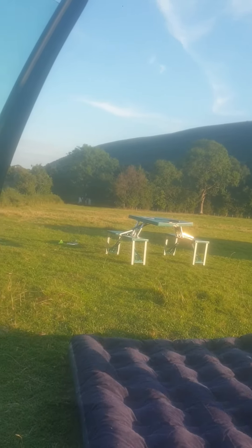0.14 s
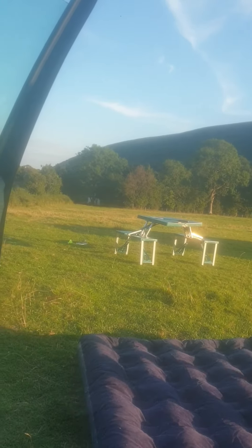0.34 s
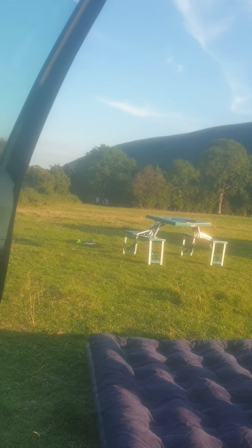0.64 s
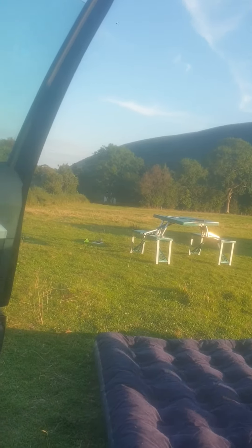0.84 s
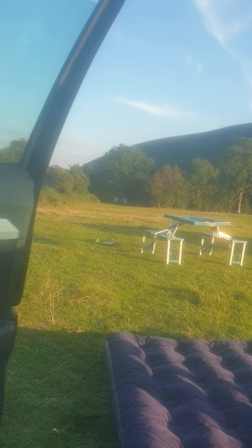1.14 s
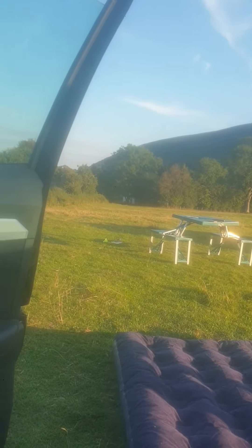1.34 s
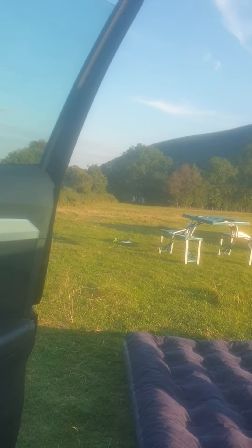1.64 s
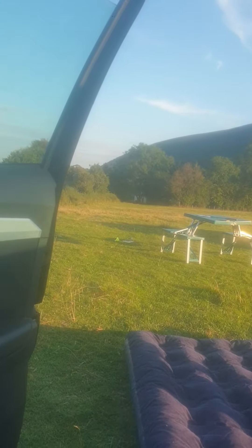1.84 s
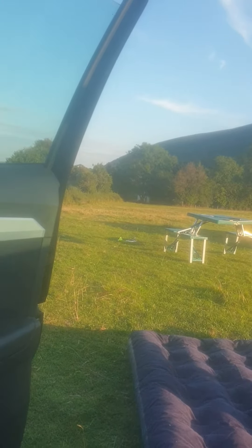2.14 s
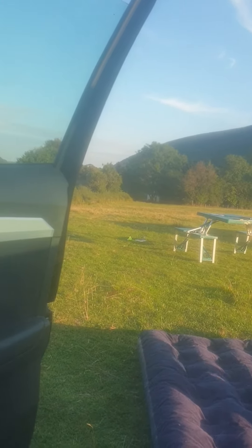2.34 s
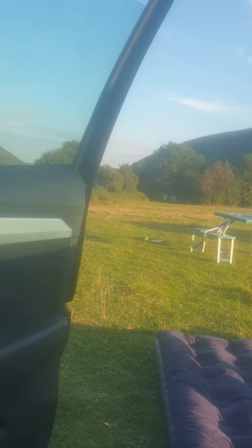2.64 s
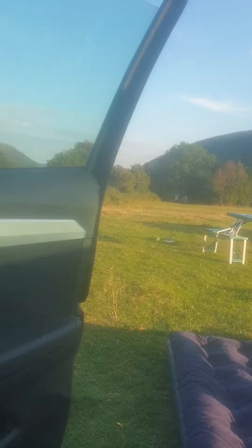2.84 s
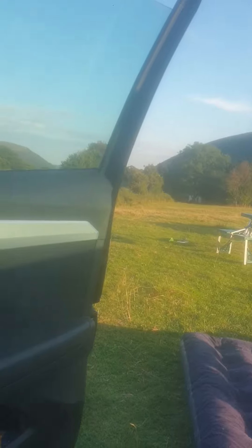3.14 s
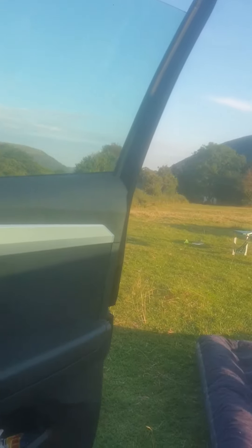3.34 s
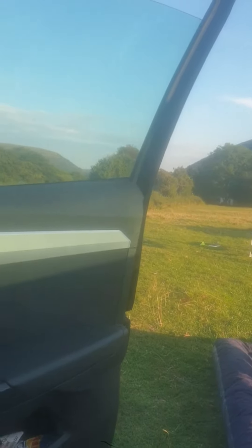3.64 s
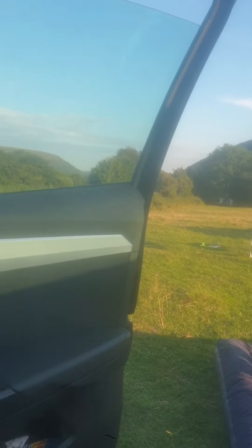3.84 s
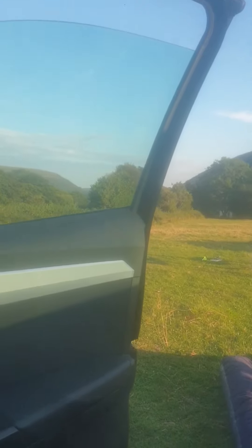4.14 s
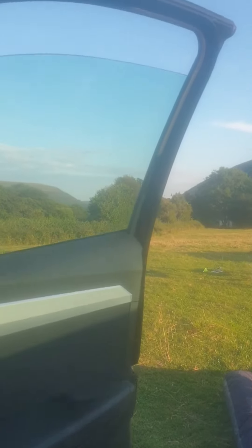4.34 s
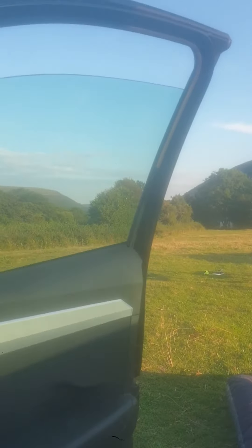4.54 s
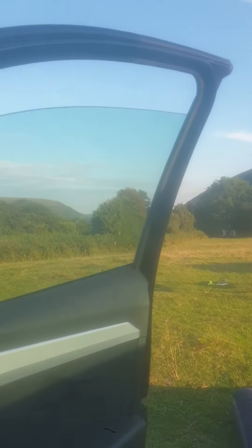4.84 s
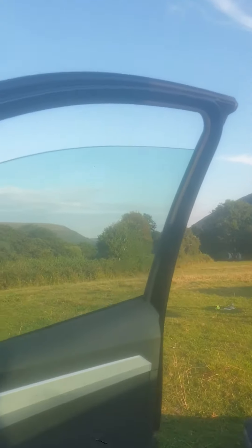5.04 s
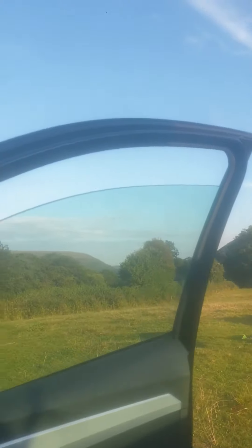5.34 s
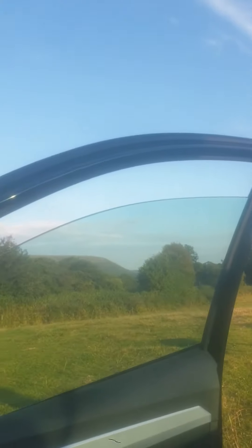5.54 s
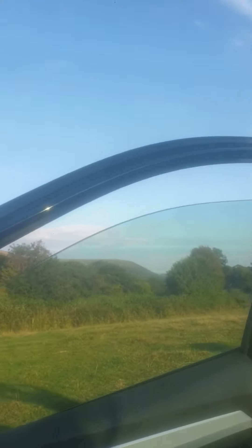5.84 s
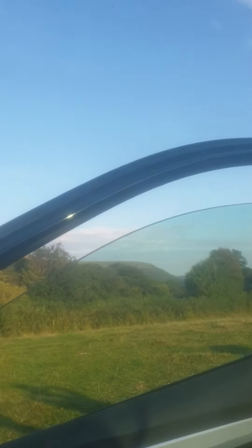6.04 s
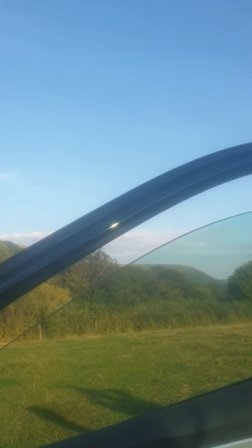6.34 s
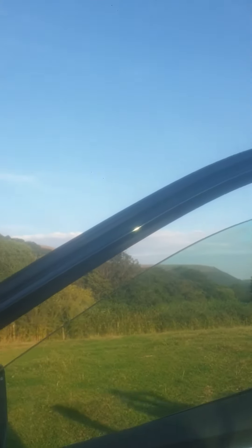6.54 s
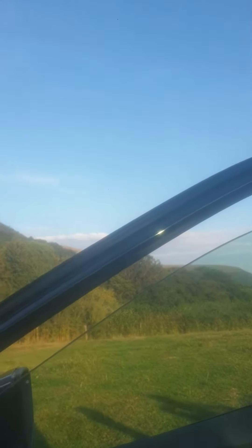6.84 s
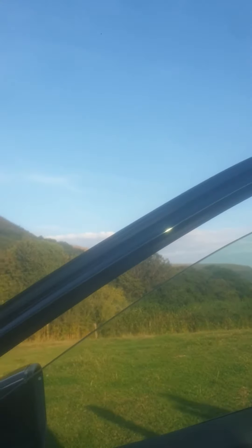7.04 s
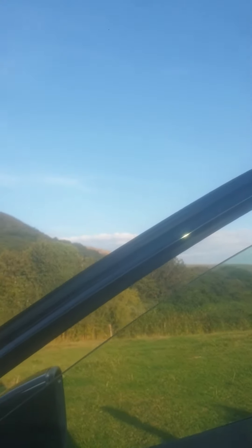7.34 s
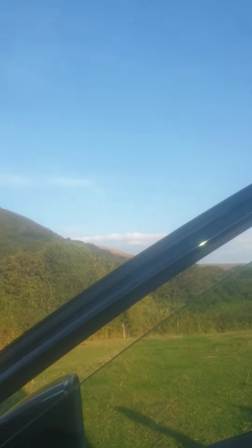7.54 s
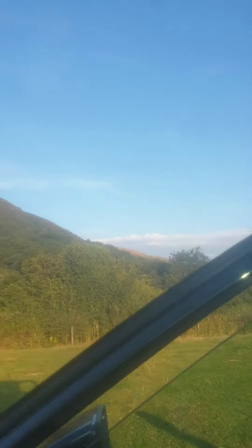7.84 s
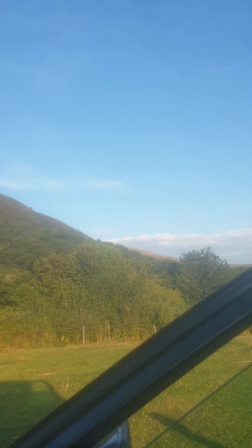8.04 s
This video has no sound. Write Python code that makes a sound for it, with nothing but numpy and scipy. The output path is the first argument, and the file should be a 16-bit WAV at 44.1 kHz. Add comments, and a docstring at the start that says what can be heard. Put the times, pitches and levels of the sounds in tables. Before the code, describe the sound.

An air mattress pump drones close by outdoors, already running and never stopping. Dozens of fast puffs per second fuse into a steady rough buzz with a boxy housing ring, squeaky edge, faint whine and airy hiss. Two dull bumps touch the handheld microphone. Later the tone shifts and hollows slightly as the microphone moves past a car door, and the hiss swells near the end before easing.

```python
"""From the first moment a small electric piston pump fills an air mattress beside a parked car in a field.
It starts a touch fast and settles near 84 strokes a second: each puff rings the housing and rasps, then a
tiny squeak follows; a motor whines and air hisses. A soft knock comes at 0.7 s. From about 4 s the two
microphones move faster behind the open car door, so shading and close reflections recolour the drone.
A fainter knock comes at 5.4 s; the hiss swells until about 7 s, then eases."""
import sys
import numpy as np
from scipy.fft import rfft, irfft, next_fast_len
from scipy.io import wavfile
from scipy.ndimage import map_coordinates

SR = 44100
rng = np.random.default_rng(int(sys.argv[2]) if len(sys.argv) > 2 else 0)


def transcribe(signal):
    """Save signal, clipped to [-1, 1], as a 16-bit WAV file at the path in sys.argv[1]."""
    frames = np.atleast_2d(signal).T
    limited = np.clip(frames, -1, 1)
    pcm = np.round(limited * 32767).astype(np.int16)
    wavfile.write(sys.argv[1], SR, pcm)


N = 361179

STROKE_HZ = 84.4  # strokes per second once the pump has settled
GEAR = 40 / 9  # motor turns per stroke


def amp(db):
    """Turn decibels into a gain."""
    return 10 ** (np.asarray(db) / 20)


def unit(x):
    """Scale to an average (rms) strength of 1."""
    return x / np.sqrt(np.mean(x ** 2) + 1e-20)


def along(points, hz):
    """Read each value column of a spectrum, in straight lines on a log frequency axis."""
    f, *columns = np.transpose(points)
    log_hz = np.log(hz + 0.0018)  # the small offset avoids log(0)
    return np.array([np.interp(log_hz, np.log(f), column) for column in columns])


def curves(rows):
    """Give one value per sample for each column after the time."""
    s, *columns = np.transpose(rows)
    return [np.interp(np.arange(N) / SR, s, column) for column in columns]


def wobble(rate):
    """Draw a smooth random curve with `rate` random points a second."""
    points = rng.standard_normal(int(N * rate / SR) + 4)
    return map_coordinates(points, [np.arange(N) * rate / SR])


def filtered(x, response):
    """Multiply the spectrum of x by a function of frequency."""
    m = next_fast_len(N + 8192)
    hz = np.fft.rfftfreq(m, 1 / SR)
    return irfft(rfft(x, m) * response(hz), m)[..., :N]


def delayed(x, ms):
    """Play x later, by a delay that may change."""
    n = np.arange(N)
    return np.interp(n - ms * SR / 1000, n, x)


def gate(turns, at, sharpness):
    """Swell once per stroke, peaking at a fraction `at` of the cycle; rms 1."""
    return unit(np.exp(sharpness * np.cos(2 * np.pi * (turns - at))))


def lobes(way, db, depth, dip_at, spacing):
    """Gain along the way through a pattern of evenly spaced dips; deeper dips also mean higher peaks."""
    angle = 2 * np.pi * (way - dip_at) / spacing
    return amp(db) * np.sqrt(np.abs(1 + depth ** 2 - 2 * depth * np.cos(angle)))


def ring_phase(db):
    """Phases of a ringing response that starts only when struck, from its harmonic levels."""
    cepstrum = irfft(np.log(amp(np.r_[db[0], db])))
    cepstrum[len(cepstrum) // 2:] = 0
    return 2 * rfft(cepstrum).imag[1:]


# Drone spectrum before shading and random treble changes; steps between rows are filled in:
# (multiple of the stroke rate, left level [dB], right level [dB])
DRONE_LEVELS = [(1, -33.1, -35.9), (2, -30.5, -31.6), (3, -51.2, -53.5), (4, -44.9, -46.2),
                (5, -31.9, -37.1), (6, -18.1, -25.8), (7, -18.8, -26.0), (8, -28.0, -32.0),
                (9, -33.4, -37.3), (10, -31.4, -34.9), (11, -30.2, -34.5), (12, -29.6, -34.6),
                (13, -27.2, -33.4), (14, -36.2, -46.0), (15, -38.2, -45.7), (16, -45.2, -48.0),
                (17, -44.9, -47.6), (18, -51.5, -55.1), (19, -43.5, -45.4), (20, -41.2, -43.4),
                (21, -39.3, -40.7), (22, -39.9, -41.6), (23, -40.7, -36.1), (24, -46.6, -42.7),
                (25, -36.4, -35.1), (26, -46.4, -44.3), (27, -45.7, -43.9), (28, -45.8, -42.2),
                (29, -42.1, -42.7), (30, -39.9, -41.6), (31, -48.4, -47.1), (32, -49.2, -45.7),
                (33, -48.0, -45.4), (34, -43.0, -47.0), (36, -50.4, -55.9), (39, -46.0, -52.0),
                (41, -44.3, -51.2), (43, -51.9, -59.1), (46, -53.1, -62.6), (48, -48.4, -56.7),
                (49, -41.2, -54.1), (50, -50.5, -63.0), (52, -54.3, -57.5), (54, -51.3, -53.5),
                (58, -56.9, -63.6), (64, -61.5, -70.6), (76, -63.0, -70.5), (95, -74.0, -78.7),
                (120, -64.9, -76.1), (186, -76.1, -80.9)]


def partials(ring=0.88, valve_hz=890, valve_width_hz=150, valve_lag=0.463, clatter_hz=1400,
             clatter_share=.36, clatter_lag=.18, apart_hz=4500, top_db=2, count=186):
    """A puff rings the housing, the valve answers late, then clatters: complex strength per partial and side."""
    k = np.arange(1, count + 1)
    hz = k * STROKE_HZ
    treble_db = top_db + 4 * rng.standard_normal(count)
    db = along(DRONE_LEVELS, k) + (hz > 5000) * treble_db
    # lateness as fractions of a cycle; summing it over the partials gives their phase
    valve = np.exp(-((hz - valve_hz) / valve_width_hz) ** 2)
    clatter = (clatter_lag + clatter_share * rng.random(count)) * (hz > clatter_hz)
    late = clatter + valve_lag * valve
    phase = ring * ring_phase(db[0]) - 2 * np.pi * np.cumsum(late)
    # the two sides agree less and less towards the treble
    phase = phase + np.minimum((hz / apart_hz) ** 2, 1) * rng.standard_normal((2, count))
    phase[0] += np.interp(hz, *np.transpose(LEFT_LEAD))
    return amp(db) * np.exp(1j * phase)


# Partials that radiate in lobes, left out of the plain drone: multiples of the stroke rate
LOBED_PARTIALS = [4, 6, 7, 13, 23, 25, 30, 34, 41, 49]


def drone(turns, stroke, flutter_db=0.03, size=8192):
    """One stroke shape repeats with the crank, without the lobed partials, and flutters slightly in level."""
    lines = np.pad(stroke, ((0, 0), (1, 0)))
    lines[:, LOBED_PARTIALS] = 0
    cycles = irfft(lines, size) * size / np.sqrt(2)
    position = np.arange(size) / size
    wave = np.array([np.interp(turns, position, cycle, period=1) for cycle in cycles])
    return wave * amp(flutter_db * wobble(40))


# One row per lobed partial, at the left and at the right microphone:
# (level without dips [dB], dip depth [0-1], place of a dip [share of the way], dip spacing [ways])
LEFT_LOBES = [(-39.5, .95, 0.34, 2.8), (-24.5, 0.98, 1.174, 3.1), (-21.5, 0.25, -0.16, 0.83),
              (-27.5, .26, 0.516, 0.47), (-40, 0.4, 0.3, 0.26), (-35, 0.33, 0.224, 0.37), (-42, 1, 0.52, 2),
              (-43, 0.7, 0.86, 0.307), (-42, 0.64, -0.15, 1.1), (-42, 0.53, 0.442, 0.25)]
RIGHT_LOBES = [(-43.5, 1, 0.5, 2.7), (-28, 0.51, 1.11, 1.73), (-30, 0.98, -.21, 1.38),
               (-29.5, 0.52, 0.095, 0.5), (-35, 0.23, 0.33, .66), (-34, 0.63, 0.55, 0.64),
               (-39.5, 0.93, .76, 0.86), (-46.6, 0.42, .07, 0.14), (-49, 0.37, .05, 0.14),
               (-55, 0.34, 0.35, 1.1)]
# One row per lobed partial, how far left leads right:
# (lead at the start of the way [radians], lead at its end [radians])
LOBE_LEADS = [(0.6, 0.5), (-0.4, -0.86), (-1.18, -0.77), (-1.1, -1.7), (-2.5, -2.5), (-1.2, -4),
              (-0.2, -2.1), (-2.2, -1), (3.9, 4.5), (-1.5, 0)]


def beams(turns, stroke, way, flutter_db=0.18):
    """Some partials radiate in lobes, so they fade and swell as the two microphones pass through."""
    out = np.zeros((2, N))
    rows = zip(LOBED_PARTIALS, LEFT_LOBES, RIGHT_LOBES, LOBE_LEADS)
    for k, left_row, right_row, (lead_start, lead_end) in rows:
        phase = 2 * np.pi * k * turns + np.angle(stroke[k - 1])
        lead = lead_start + (lead_end - lead_start) * way
        left = np.cos(phase) * lobes(way, *left_row)
        right = np.cos(phase - lead) * lobes(way, *right_row)
        out += np.sqrt(2) * np.array([left, right]) * amp(flutter_db * wobble(30))
    return out


# Phase offset of the left microphone: (frequency [Hz], lead of the left [radians])
LEFT_LEAD = [(0, 0), (1290, -1.44), (1720, -2.5), (2150, -1.9), (2410, -5), (3360, -10), (4130, -19),
             (5080, -4.5), (6120, -9), (7060, -7.5), (8440, -13), (10100, -9), (11600, -9.5), (16000, -2)]


def noise_pair(alike_hz):
    """White noise at both microphones: shared in the bass, unrelated in the treble."""
    def share(hz):
        return 1 / (1 + (hz / alike_hz) ** 2)

    def side_phase(hz):
        return np.exp(1j * np.interp(hz, *np.transpose(LEFT_LEAD)) * [[1], [0]])

    shared = filtered(rng.standard_normal(N), lambda hz: np.sqrt(share(hz)) * side_phase(hz))
    separate = filtered(rng.standard_normal((2, N)), lambda hz: np.sqrt(1 - share(hz)))
    return shared + separate


# Air rushing through the valves, before trim and shading:
# (frequency [Hz], left level [dB per Hz], right level [dB per Hz])
AIR_SPECTRUM = [(14.9, -71, -65), (31.2, -70.5, -70), (86, -73, -72), (284, -83, -78), (560, -59.5, -71),
                (757, -69.5, -74), (1010, -62.5, -61.5), (1300, -70, -65.5), (2150, -66, -64.5),
                (3340, -70.5, -79), (4500, -68, -71), (6240, -78.5, -83), (8300, -89, -98),
                (11900, -110, -115)]


def valve_air(turns, trim_db=-0.4, pulse_hz=1300):
    """Each puff stirs up rough, noisy air; its middle range pulses hardest and makes the rasp."""
    rush = filtered(noise_pair(alike_hz=2650), lambda hz: amp(along(AIR_SPECTRUM, hz))) * np.sqrt(SR / 2)
    rasp = filtered(rush, lambda hz: (hz > pulse_hz) & (hz < 3000))
    soft_puffs = (rush - rasp) * gate(turns, at=0.53, sharpness=0.15)
    rasp_puffs = rasp * gate(turns, at=0.51, sharpness=0.53)
    return amp(trim_db) * (soft_puffs + rasp_puffs)


def squeak(turns, way, overtone_db=-9, waver=0.99, order=82):
    """The piston seal chirps late in each stroke with varying strength; it too radiates in lobes."""
    sweep = 0.69 * np.sin(2 * np.pi * (turns - .72))
    phase = 2 * np.pi * order * turns + sweep + waver * wobble(35)
    tone = np.sin(phase) + amp(overtone_db) * np.sin(2 * phase)
    chirps = unit(tone * gate(turns, at=0.77, sharpness=1.04) * amp(1.2 * wobble(70)))
    left_gain = lobes(way, db=-43.2, depth=0.66, dip_at=0.53, spacing=1.53)
    right_gain = lobes(way, db=-56.0, depth=0.38, dip_at=0.017, spacing=2.0)
    return chirps * np.array([left_gain, right_gain])


# Motor whine before side balance, shading and random level changes: (multiple of the motor speed, level [dB])
WHINE_LEVELS = [(1, -57.5), (2, -52.5), (3, -58.5), (4, -46.5), (5, -69.5), (6, -51)]


def motor(turns):
    """The fast motor shaft whines between the partials of the drone, wavering in level and phase."""
    whine = np.zeros(N)
    for k, db in WHINE_LEVELS:
        level = amp(db + 0.9 * wobble(10))
        phase = 2 * np.pi * round(k) * GEAR * turns + .5 * wobble(14)
        whine += level * np.sqrt(2) * np.sin(phase)
    return whine


# Colour of the fine hiss; only differences between rows matter: (frequency [Hz], level [dB per Hz])
HISS_SPECTRUM = [(4410, -13.5), (7500, 4), (8380, -8.5), (10200, 2.5), (13100, 2), (14200, 0.5),
                 (15100, 3.5), (15700, -8)]
# Loudness of the fine hiss before its boost and side balance: (time [s], level [dB])
HISS_LOUDNESS = [(0.0, -46), (2.14, -45), (5.7, -44.5), (6.82, -43.5), (7.12, -41), (8.19, -44)]


def leak(turns, boost_db=6):
    """Fine hiss from the intake, swelling faintly with each stroke and louder on the left."""
    hiss = unit(filtered(noise_pair(alike_hz=6150), lambda hz: amp(along(HISS_SPECTRUM, hz))))
    level = amp(curves(HISS_LOUDNESS)[0] + boost_db)
    sides = amp([[0], [-5.5]])
    return hiss * level * gate(turns, at=0.65, sharpness=0.053) * sides


# Soft handling knocks: (time [s], level at the start of the decay [dB], pitch [Hz])
KNOCKS = [(0.736, -35, 230), (5.39, -42, 330)]


def bumps(t60=0.044):
    """A hand nudges the microphones: a short, dull tone that fades by 60 dB in t60 seconds."""
    out = np.zeros(N)
    for s, db, hz in KNOCKS:
        t = np.maximum(np.arange(N) / SR - s, 0)
        out += amp(db - 60 * t / t60) * np.sin(2 * np.pi * hz * t)
    return out


def travel(x, way, shade, echoes, low_hz=150, high_hz=5500):
    """The door shades each range and near surfaces echo it; both glide along the way."""
    def glide(start, end):
        return start + (end - start) * way

    # split into overlapping ranges that add up to the whole
    registers = filtered(x, lambda hz: along(np.c_[np.array(shade)[:, 0], np.eye(len(shade))], hz))
    shaded = np.zeros(N)
    for band, (_, start_db, end_db) in zip(registers, shade):
        shaded += band * amp(glide(start_db, end_db))
    # echoes lose some bass and treble
    bounce = filtered(shaded, lambda hz: hz ** 2 / (hz ** 2 + low_hz ** 2) / np.sqrt(1 + (hz / high_hz) ** 2))
    reflections = np.zeros(N)
    for start_ms, end_ms, start_gain, end_gain in echoes:
        reflections += glide(start_gain, end_gain) * delayed(bounce, glide(start_ms, end_ms))
    return shaded + reflections


# How far the microphones have moved behind the door: (time [s], share of the way [0-1])
WAY_COVERED = [(0, 0.04), (3.4, 0.13), (4.2, 0.16), (5.3, 0.48), (6, 0.56), (7.4, 0.69), (8.19, 0.88)]
# Shading by the door: (frequency [Hz], level at the start of the way [dB], level at its end [dB])
LEFT_DOOR = [(150, 2.5, -2), (536, -0.5, -7), (1010, -1.8, -0.8), (1520, 0.3, 1.3), (2100, 1.5, -1),
             (3200, -1.3, 1.5), (4500, -0.05, -0.4)]
RIGHT_DOOR = [(150, 0.75, -2.5), (550, -0.1, -3.5), (1010, -1.4, -2.5), (1490, -1.1, 0), (2100, .6, -1.5),
              (3120, -1.9, -5.5), (4500, -1.8, -1)]
# Near surfaces; a negative gain flips the echo:
# (delay at the start of the way [ms], delay at its end [ms], gain at the start [x], gain at the end [x])
LEFT_SURFACES = [(1.734, 1.47, -0.12, 0.23), (2.31, 0.41, 0.2, 0.23), (2.26, 2.4, -0.072, -0.042),
                 (0.592, 0.31, -0.29, -0.092)]
RIGHT_SURFACES = [(2.63, 2.12, 0.33, -0.38), (2.29, 1.226, -0.22, 0.44), (3.06, 1.104, -0.23, -0.27),
                  (2.425, 1.86, 0.47, 0.17)]


def scene(jitter=0.00024, drift=0.0044, gear_ripple=0.00022, sag_hz=.2, settle_s=1.1):
    """All pump sounds follow the strokes, which sag as the load grows; drone and lobes also feel gear shake."""
    speed_hz = STROKE_HZ + sag_hz * np.exp(-np.arange(N) / SR / settle_s)
    turns = np.cumsum(speed_hz) / SR + drift * wobble(6)
    crank = turns + jitter * wobble(60) + gear_ripple * np.sin(2 * np.pi * GEAR * turns)
    way, = curves(WAY_COVERED)
    stroke = partials()
    left, right = drone(crank, stroke) + valve_air(turns) + motor(turns) * amp([[0], [-3]])
    pump = np.array([travel(left, way, LEFT_DOOR, LEFT_SURFACES),
                     travel(right, way, RIGHT_DOOR, RIGHT_SURFACES)])
    return pump + beams(crank, stroke[0], way) + squeak(turns, way) + leak(turns) + bumps()


def record(dry, top_hz=15750):
    """Cut away everything from the upper band limit upwards."""
    return filtered(dry, lambda hz: hz < top_hz)


dry = scene()
out = record(dry)
transcribe(out)
```